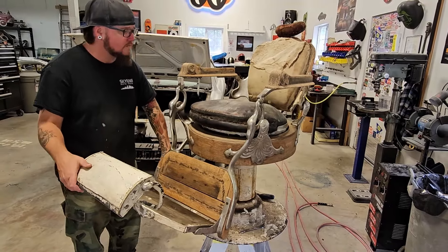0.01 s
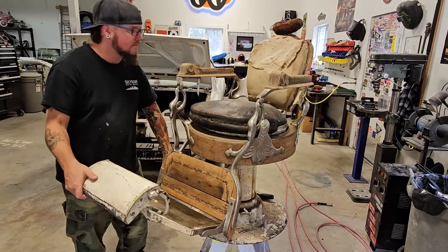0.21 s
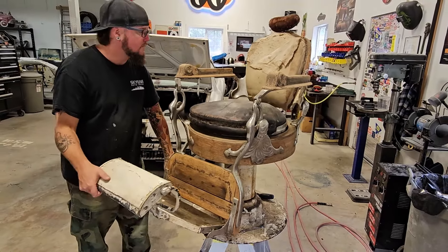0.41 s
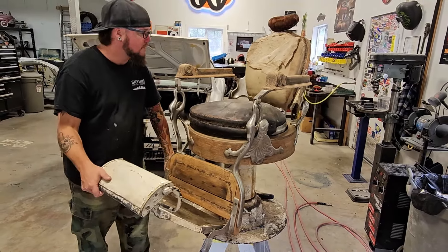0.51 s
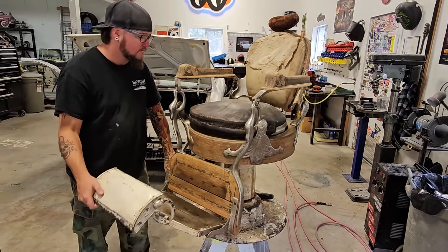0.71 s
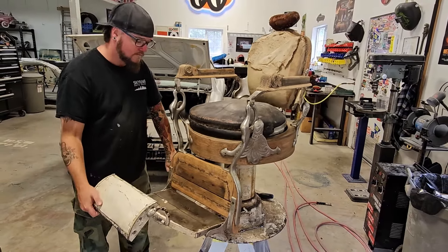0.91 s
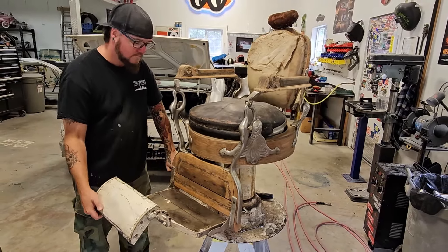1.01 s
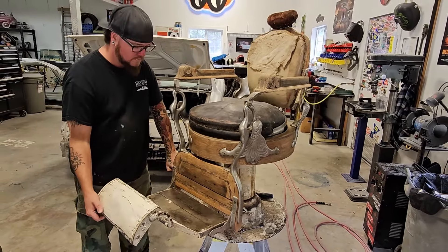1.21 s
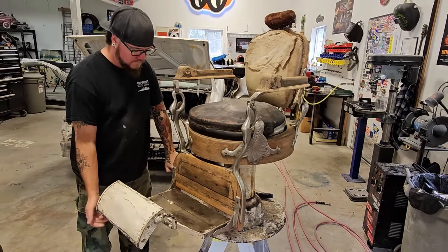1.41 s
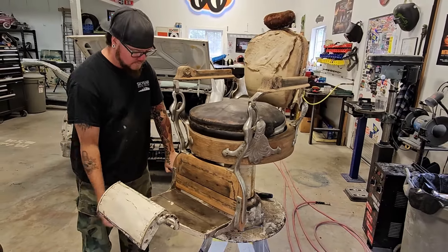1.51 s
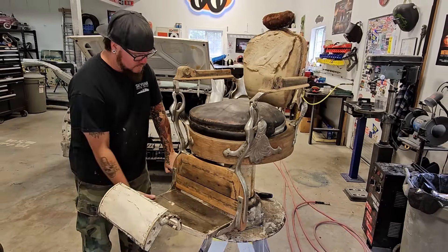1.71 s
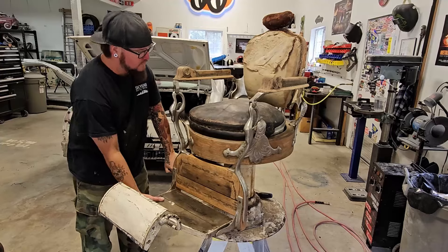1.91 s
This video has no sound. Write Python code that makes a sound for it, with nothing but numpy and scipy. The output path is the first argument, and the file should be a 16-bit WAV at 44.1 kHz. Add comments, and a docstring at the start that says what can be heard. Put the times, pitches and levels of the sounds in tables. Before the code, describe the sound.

An old reclining chair is adjusted, its iron linkage clacking sharply at about 0.2 seconds. Smaller clacks, rattling pins and wooden knocks follow until 0.6 seconds, then softer knocks around 0.9. Near 1.2 seconds the footrest hits its stop with a short metallic ring, wooden thuds and a very brief hinge creak. The workshop echo fades from about 1.4 seconds, leaving a quiet, steady low rumble.

```python
"""First comes a faint rattle with soft wooden knocks: an old reclining chair is worked by hand.
Its iron linkage lets go with a clack, loose pins chatter, and wooden parts knock and thud.
Then the footrest hits its stop and rings, and a dry hinge sticks and slips with a brief groan.
The large, hard-walled workshop echoes every sound, over a low, steady background rumble."""
import sys
import numpy as np
from scipy import signal
from scipy.fft import rfft, irfft
from scipy.io import wavfile
from scipy.ndimage import uniform_filter1d

SR = 44100
rng = np.random.default_rng(int(sys.argv[2]) if len(sys.argv) > 2 else 0)


def master_out(mix):
    """Clip the mix to full scale and print it as 16-bit PCM to the path in sys.argv[1]."""
    frames = np.transpose(np.atleast_2d(mix))
    ceiling = np.clip(frames, -1, 1)
    pcm = np.round(ceiling * 32767).astype(np.int16)
    wavfile.write(sys.argv[1], SR, pcm)


N = 88200
T = np.arange(N) / SR

# A "colour" says how strong each frequency is. A "tilt" above zero makes a sound brighter.
# "t60" is the time a sound takes to fade by 60 dB.
# Bursts of rattling: t/s, length/s, level/dB, tilt/(dB per octave)
RATTLES = [(0.0, 0.093, -53.5, -7.5), (0.235, 0.096, -40.5, 0), (0.37, 0.23, -48.5, -1.5),
           (0.869, .03, -55, -4), (0.985, 0.057, -73, 6.5), (1.264, .02, -60.5, 5.5), (1.46, .05, -73, 1.5),
           (1.881, .03, -83, 0)]
# Colour of the iron pins and links: f/Hz, level/dB
IRON_COLOUR = [(60, -23.5), (200, -2.5), (400, -4), (620, 0), (1000, -4), (1400, -2), (2100, -5),
               (4000, -4), (6300, -7.5), (9000, -14), (16000, -24)]
# How long the hall rings: f/Hz, t60/s
HALL_T60 = [(80, 1.5), (250, 1.0), (500, 0.85), (1200, 1.2047), (2500, 0.97), (5000, 0.96), (9000, 0.49),
            (16000, 1.04)]
# Colour of the hall's long echo: f/Hz, level/dB
HALL_COLOUR = [(60, -13), (250, -2.5), (500, 5), (1000, -0.5), (2200, 0.5), (5000, -0.5), (9000, 1.5),
               (16000, -9)]
# Colour of the ring already in the hall at the start: f/Hz, level/dB
LINGER_COLOUR = [(80, 10), (220, 13), (500, 12.5), (1200, 0.5), (4300, -5.5), (6000, -14), (16000, -26.5)]
# Colour of the workshop background: f/Hz, level/dB
BACKGROUND_COLOUR = [(20, -7), (55, -1.5), (100, -9), (200, -20), (500, -18.5), (1500, -33), (4000, -42),
                     (8000, -51), (16000, -72)]
# Wooden knocks and thuds: t/s, level/dB, t60/s, lowest f/Hz, highest f/Hz
KNOCKS = [(0.002, -82, 0.22, 166, 700), (0.063, -54, 0.06, 424, 1390), (0.094, -56.5, .12, 158, 480),
          (0.206, -59.5, 0.084, 398, 1100), (0.224, -41.5, 0.2, 379.6, 480), (0.227, -48.5, 0.12, 114, 288),
          (0.257, -51.5, 0.14, 66, 100), (0.359, -50.5, 0.14, 121, 705), (0.4329, -48, 0.011, 1118, 1740),
          (0.465, -48, .07, 400, 683), (0.455, -46.5, 0.25, 71.5, 280), (0.827, -52, 0.01, 480, 950),
          (0.8275, -59, 0.017, 1300, 2150), (0.871, -53.5, 0.018, 1620, 2490),
          (0.868, -55.5, 0.38, 110, 298), (0.888, -56, 0.29, 366, 1160), (0.995, -57, 0.041, 407, 1000),
          (1.01, -51.5, 0.19, 166, 330), (0.99, -57, .4, 60, 207), (1.152, -53, .15, 70, 500),
          (1.175, -44, .2, 88, 324), (1.182, -43, .1, 400, 1000), (1.236, -42.5, 0.17, 430, 1025),
          (1.239, -47.5, .2, 126, 286), (1.251, -51, 0.43, 39.3, 130), (1.325, -48, 0.25, 100, 380),
          (1.529, -64, 0.11, 205, 244.6)]
# Clacks of the linkage: t/s, level/dB, t60/s, tilt/(dB per octave), stereo width/(0 to 1)
CLACKS = [(0.2217, -44, 0.043, -3, 0.6), (0.2247, -31, 0.031, -0.13, 0.64),
          (0.3496, -41.5, 0.022, -1, 0.47), (0.353, -41.5, 0.079, -1.5, 0.86), (0.432, -44, 0.1, -3, 1),
          (0.496, -50, 0.21, 1, 0.8), (0.582, -46, 0.097, 3.5, 0.5)]
# Tones at which the links ring: f/Hz, level/dB, t60/s
LINK_TONES = [(417, -0.5, 0.07), (619, -9.5, .08), (801, -9, 0.11), (1234, 6, 0.037), (1326, 1.5, 0.051),
              (1367, -9, 0.025), (2110, -3.5, 0.23), (2920, -6, 0.24), (4940, -18, 0.46), (5220, -6, 0.22),
              (6170, -14, 0.14), (6870, -13.5, 0.24)]
# Hits of the footrest on its stop: t/s, level/dB
FOOTREST_HITS = [(1.1624, -60.5), (1.168, -39.5), (1.1837, -54.5)]
# Tones at which the footrest rings: f/Hz, level/dB, t60/s
FOOTREST_TONES = [(241.1, -5.5, 0.52), (471, -9, 0.091), (758, -0.5, 0.13), (972, -13, .09),
                  (1340, 2, 0.058), (1448, -1.5, 0.064), (2170, -1.5, 0.12), (2266, 0.5, 0.07),
                  (2850, -11, 0.068), (3700, 1.5, 0.029), (4690, -14.5, 0.11), (5300, -9.5, 0.11),
                  (5850, -15, 0.077), (7540, -7, 0.082), (10070, -22.5, 0.14), (11900, -30, 0.15),
                  (13500, -29, 0.15)]
# Colour of the footrest's crack: f/Hz, level/dB
CRACK_COLOUR = [(100, -5), (400, -6), (900, -4), (1500, 1.5), (2600, -3), (3800, -4), (4400, -16.5),
                (6000, -15), (10000, -25), (16000, -67)]
# Groans of the hinge: t/s, length/s, f/Hz, level/dB
GROANS = [(1.205, 0.017, 458, -41), (1.243, 0.0108, 517.6, -40), (1.2615, 0.0136, 478, -34.5)]


def gain(db):
    """Turn decibels into a number to multiply by."""
    return 10 ** (np.asarray(db) / 20)


def unit(x):
    """Give a sound the energy of one second at full level."""
    return x / np.sqrt(np.mean(x ** 2) * N / SR)


def fade(t60):
    """A curve that falls by 60 dB every t60 seconds."""
    return np.exp(-np.log(1000) * T / max(t60, .002))


def look_up(points, hz):
    """Read between the rows of a (frequency, value) table, with octaves evenly spaced."""
    freqs, values = np.array(points, float).T
    return np.interp(np.log(np.maximum(hz, 1)), np.log(freqs), values)


def colour(x, points, tilt=0):
    """Filter a sound to give it a colour and a tilt."""
    hz = np.arange(N + 1) * SR / (2 * N)
    db = look_up(points, hz) + tilt * np.log2(np.maximum(hz, 300) / 1000)
    cepstrum = irfft(np.log(gain(db)))
    cepstrum[1:N] *= 2  # folded forward, so the filter never rings before a hit
    cepstrum[N + 1:] = 0
    return irfft(rfft(x, 2 * N) * np.exp(rfft(cepstrum)))[..., :N]


def band(x, lo_hz, hi_hz, order=2):
    """Keep the part of a sound between two frequencies."""
    edges = [lo_hz, min(max(hi_hz, lo_hz * 1.1), SR * .48)]
    return signal.sosfilt(signal.butter(order, edges, "band", fs=SR, output="sos"), x)


def delay(x, seconds):
    """Start a sound later."""
    silence = np.zeros(x.shape[:-1] + (int(seconds * SR),))
    return np.concatenate([silence, x], axis=-1)[..., :N]


def noise(width=1, alike_below_hz=480):
    """Stereo noise: left and right are alike in the bass and further apart in the treble."""
    mid, side = rng.standard_normal((2, N))
    apart = (np.arange(N // 2 + 1) * SR / N / alike_below_hz) ** 2
    side = irfft(rfft(side) * width * (apart + 0.12) / (apart + 1), N)
    return np.array([mid + side, mid - side])


def rattle(ticks_per_s=240, spread_db=3):
    """Loose pins chatter in quick, uneven ticks after the frame is moved."""
    out = 0
    for start, length, db, tilt in RATTLES:
        due = (rng.random(N) < ticks_per_s / SR) & (T < length)
        due[0] = True  # every burst opens with a tick
        taps = due * gain(spread_db * rng.standard_normal(N))
        ticks = signal.fftconvolve(taps[None], noise() * fade(t60=.03), axes=1)[:, :N]
        out += delay(gain(db) * unit(colour(ticks, IRON_COLOUR, tilt)), start)
    return out


def hall_tail(lowest_hz=62.5):
    """Countless echoes blur into noise, and each half octave fades at its own speed."""
    spectrum = rfft(noise())
    hz = np.maximum(np.arange(N // 2 + 1) * SR / N, 1)
    half_octaves = np.clip(2 * np.log2(hz / lowest_hz), 0, 16)
    out = 0
    for k in range(17):
        share = np.maximum(1 - abs(half_octaves - k), 0)
        t60 = look_up(HALL_T60, lowest_hz * 2 ** (k / 2))
        out += irfft(spectrum * share, N) * fade(t60)
    return out


def hall(x, build_s=0.0048, tail_db=-1, early_db=-10):
    """Quick echoes come off the floor and benches, then the whole hall rings on."""
    build = 1 - np.exp(-(T / build_s) ** 2)
    tail = colour(unit(hall_tail() * build), HALL_COLOUR)
    early = unit(noise() * build * fade(t60=0.11))
    response = (gain(tail_db) * tail + gain(early_db) * early) / np.sqrt(SR)
    return signal.fftconvolve(x, response, axes=1)[:, :N]


def lingering_ring(db=-50):
    """The hall still rings faintly from the chair being handled a moment ago."""
    return gain(db) * unit(colour(hall_tail(), LINGER_COLOUR))


def background(db=-52.5):
    """The workshop's quiet, steady rumble."""
    rumble = colour(noise(), BACKGROUND_COLOUR)
    return gain(db) * rumble / np.std(rumble)


def wood(fringe_db=-7, push_db=-2):
    """Boards and padding knock: big soft parts sound low and long, small hard ones high and short."""
    out = 0
    for start, db, t60, lo, hi in KNOCKS:
        rise_s = .02 * t60
        blow = noise(width=.15) * fade(t60) * (1 - np.exp(-T / rise_s))
        fringe = unit(band(blow, lo / 2, hi * 2, order=3))  # an octave wider on each side
        shudder = unit(band(blow, lo, hi, order=3)) + gain(fringe_db) * fringe
        push = unit(band(signal.unit_impulse(N), lo, hi, order=3))  # the clean first thump
        out += delay(gain(db) * unit(shudder + gain(push_db) * push), start)
    return out


def metal_ring(tones, spread, count=7, contact_s=0.0014):
    """Struck iron rings: each tone is a bunch of close pitches that waver against each other."""
    out, t = np.zeros((2, N)), T[:N // 4]
    for hz, db, t60 in tones:
        detune = 1 + spread * (np.linspace(-1, 1, count) + rng.standard_normal(count) / count)
        turns = rng.random() + .22 * rng.standard_normal(count)  # the waves start out of step
        turns = turns + 0.054 * rng.standard_normal((2, count))  # and vary from left to right
        waves = np.sin(2 * np.pi * (hz * detune[:, None] * t + turns[..., None]))
        tone = waves.sum(axis=1) * fade(t60)[:len(t)]
        out[:, :len(t)] += gain(db) * np.sqrt(abs(t60)) * unit(tone)
    return unit(out * (1 - np.exp(-T / contact_s)))


def linkage(ring_db=-9):
    """Iron links strike each other: a short, noisy crash with a few ringing tones."""
    out = 0
    for start, db, t60, tilt, width in CLACKS:
        crash = unit(colour(noise(width) * fade(t60), IRON_COLOUR, tilt))
        tones = [(hz, level + tilt * np.log2(hz), decay) for hz, level, decay in LINK_TONES]
        ring = metal_ring(tones, spread=.018)
        out += delay(gain(db) * unit(crash + gain(ring_db) * ring), start)
    return out


def footrest(ring_db=3, crack_db=1):
    """The cast plate hits its stop with a crack, rings and bounces."""
    out = 0
    for start, db in FOOTREST_HITS:
        crack = unit(colour(noise(width=0.28) * fade(t60=0.024), CRACK_COLOUR))
        ring = metal_ring(FOOTREST_TONES, spread=0.0332)
        out += delay(gain(db) * (gain(ring_db) * ring + gain(crack_db) * crack), start)
    return out


def hinge(wobble=0.12, overtone_db=-23, rasp_db=-35, edge_s=.0016):
    """A dry pivot sticks and slips in short spurts, with a rasp on every slip."""
    out = 0
    for start, length, hz, db in GROANS:
        waver = unit(uniform_filter1d(rng.standard_normal(N), size=120))
        phase = 2 * np.pi * np.cumsum(hz * (1 + wobble * waver)) / SR
        overtones = sum(np.sin(k * phase) * 2 / k for k in range(2, 6))
        tone = np.sin(phase) + gain(overtone_db) * overtones
        rasp = gain(rasp_db) * noise() * (1 + np.cos(phase)) / 2
        spurt = np.clip(T / edge_s, 0, 1) * np.clip((length - T) / edge_s, 0, 1)
        groan = band((tone + rasp) * spurt, lo_hz=328, hi_hz=5000)
        out += delay(gain(db) * unit(groan), start)
    return out


def scene(pan_db=1.7, right_lag_s=.00007):
    """The chair a little to the left, its echoes and the quiet workshop."""
    blows = linkage() + rattle() + wood() + footrest()
    groan = hinge()
    left, right = blows + groan
    direct = np.array([left * gain(pan_db / 2), delay(right, right_lag_s) * gain(-pan_db / 2)])
    bounce = gain(-14.5) * delay(blows, seconds=.0105)  # first echo, off the concrete floor
    echoes = hall(blows + gain(-2.5) * groan)  # the hinge under the seat reaches the hall less
    return direct + bounce + echoes + lingering_ring() + background()


def record(dry, ceiling=1.2, top_hz=16300):
    """Round off the tallest peaks and cut the highest treble."""
    rounded = ceiling * np.tanh(dry / ceiling)
    return signal.sosfilt(signal.ellip(12, .2, 80, top_hz, fs=SR, output="sos"), rounded)


dry = scene()
out = record(dry)
master_out(out)
```